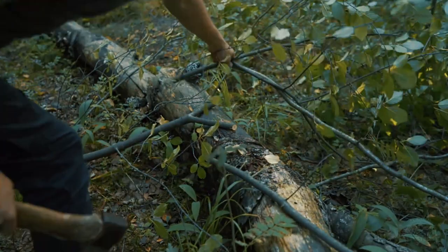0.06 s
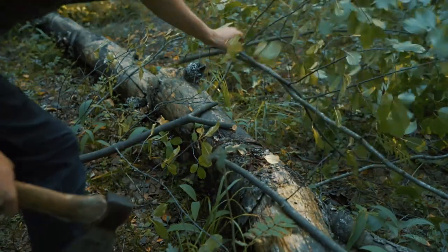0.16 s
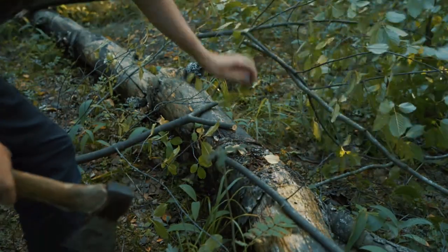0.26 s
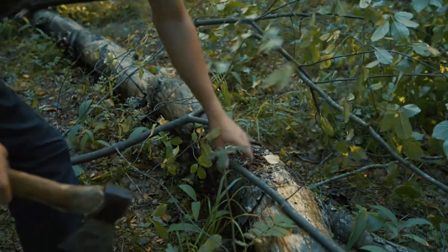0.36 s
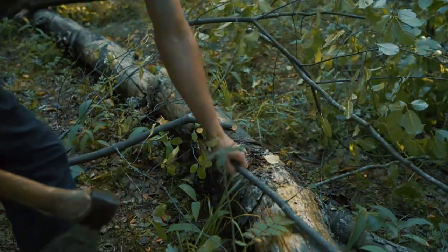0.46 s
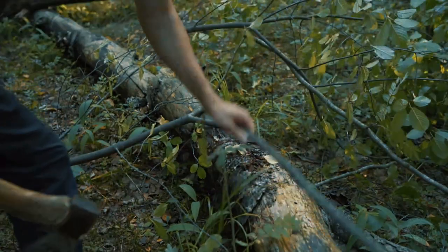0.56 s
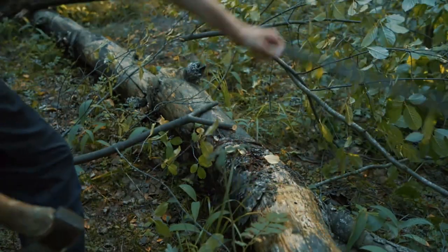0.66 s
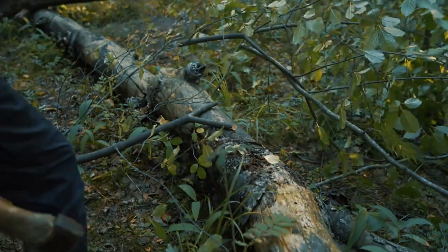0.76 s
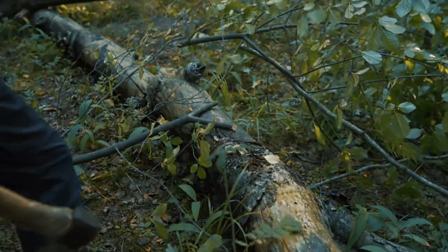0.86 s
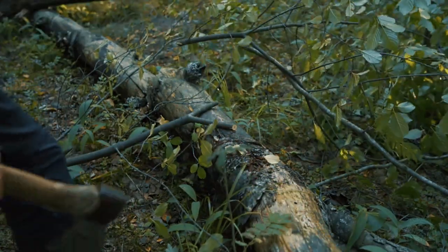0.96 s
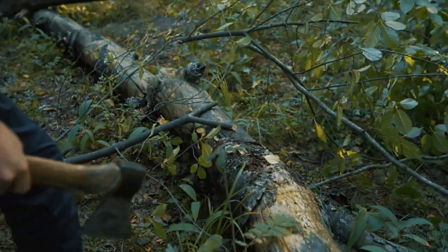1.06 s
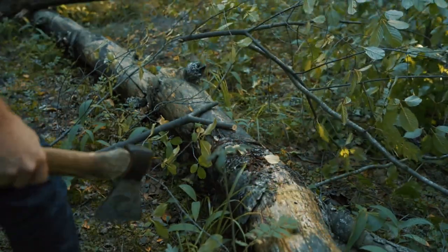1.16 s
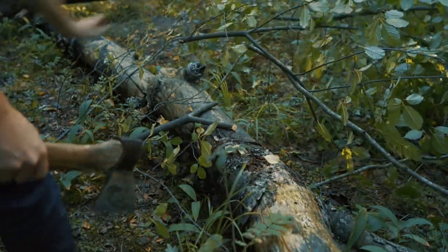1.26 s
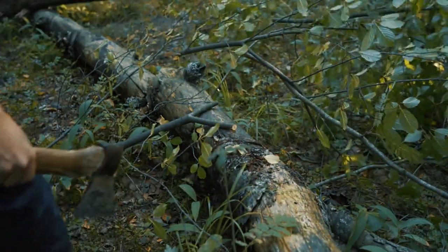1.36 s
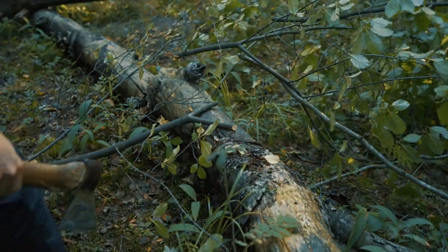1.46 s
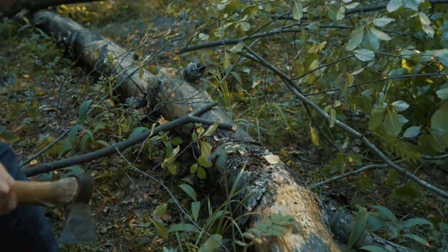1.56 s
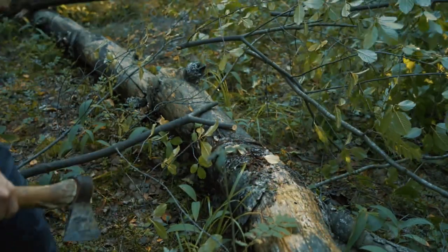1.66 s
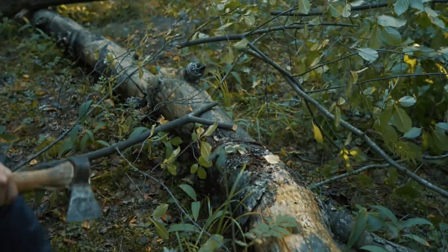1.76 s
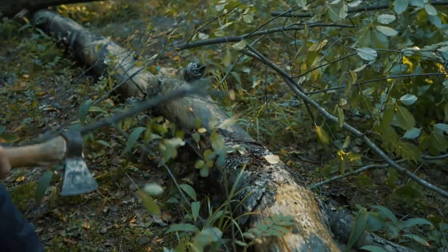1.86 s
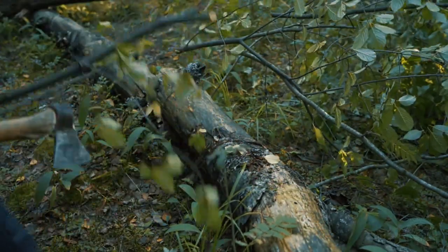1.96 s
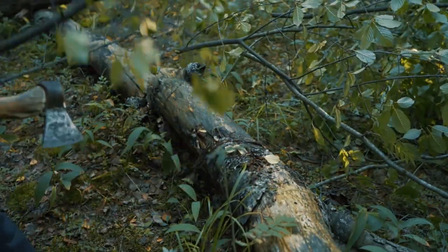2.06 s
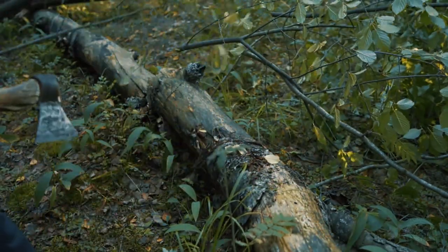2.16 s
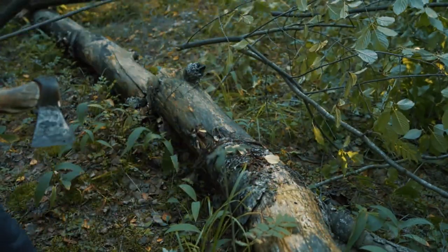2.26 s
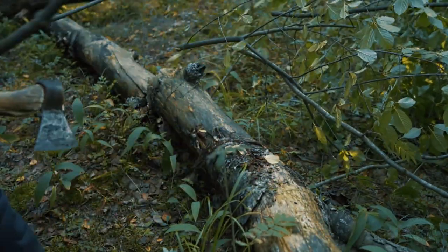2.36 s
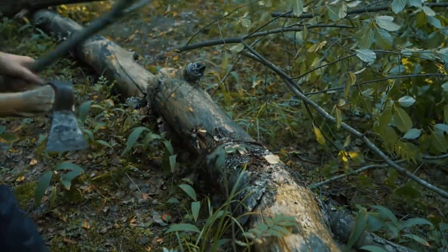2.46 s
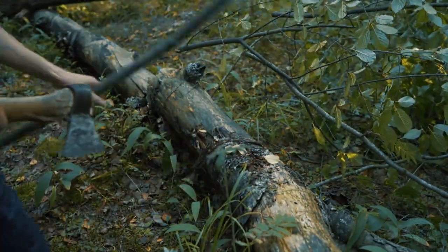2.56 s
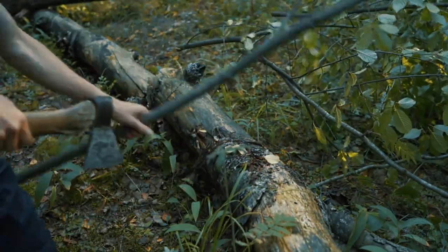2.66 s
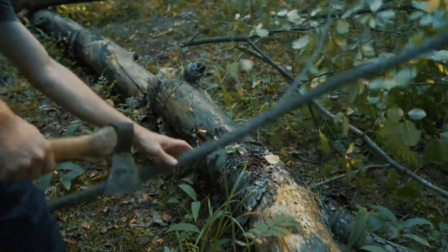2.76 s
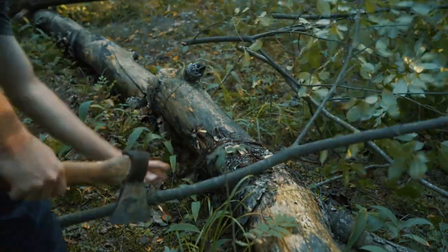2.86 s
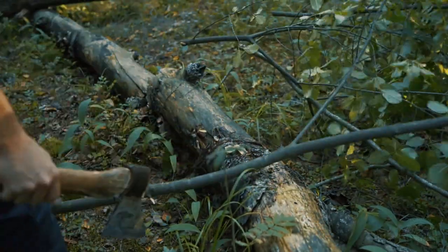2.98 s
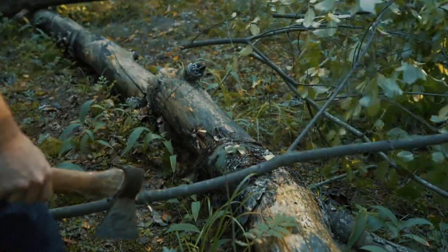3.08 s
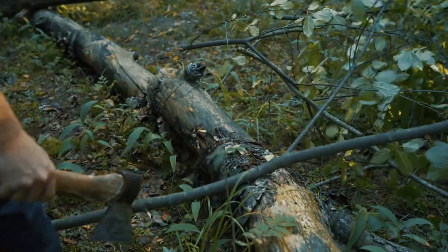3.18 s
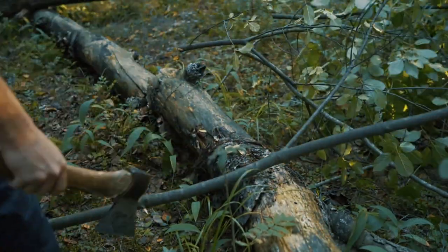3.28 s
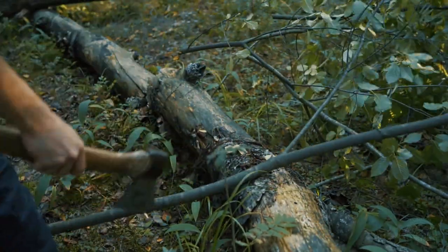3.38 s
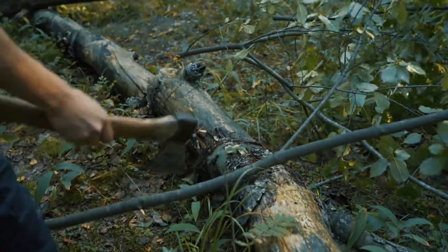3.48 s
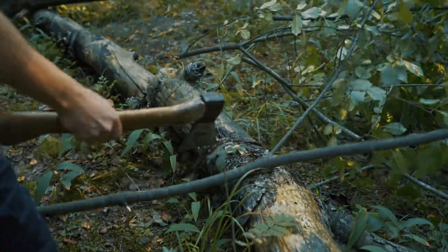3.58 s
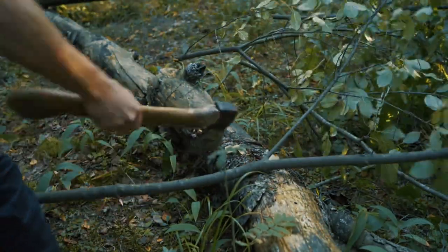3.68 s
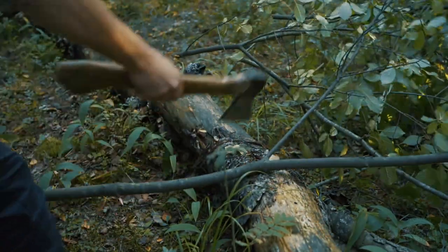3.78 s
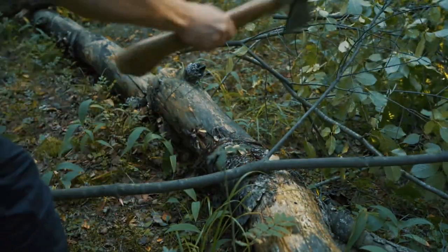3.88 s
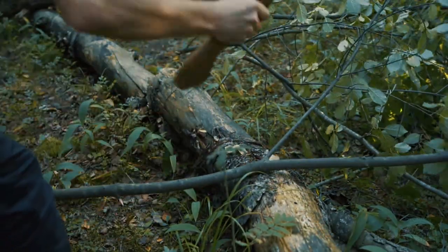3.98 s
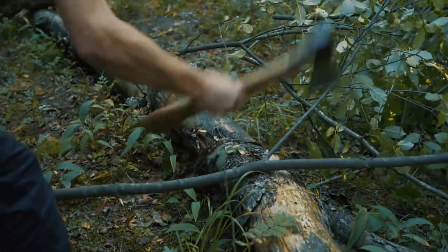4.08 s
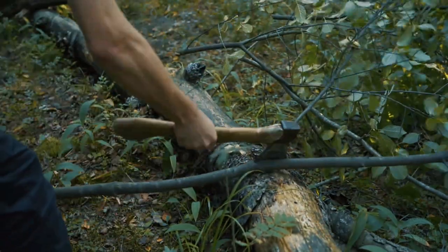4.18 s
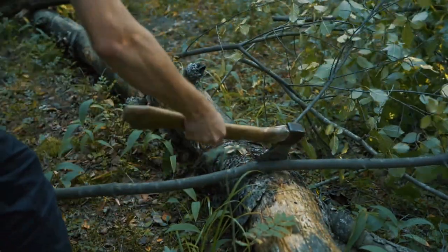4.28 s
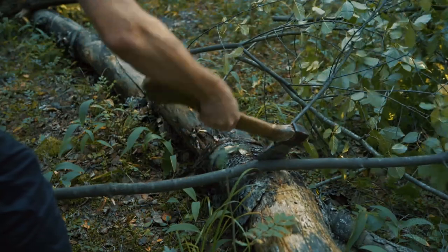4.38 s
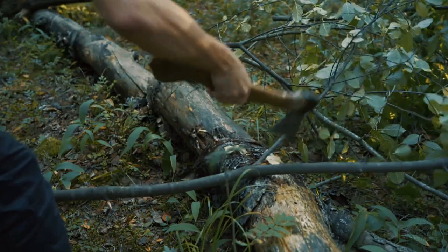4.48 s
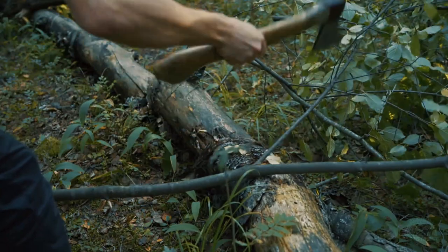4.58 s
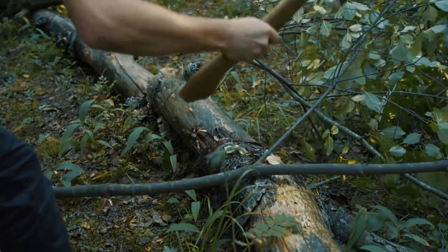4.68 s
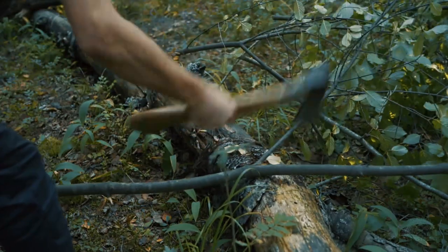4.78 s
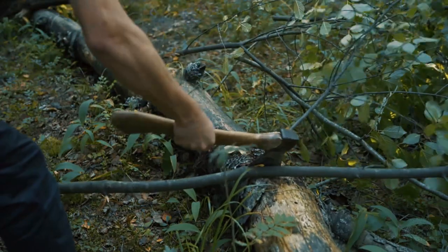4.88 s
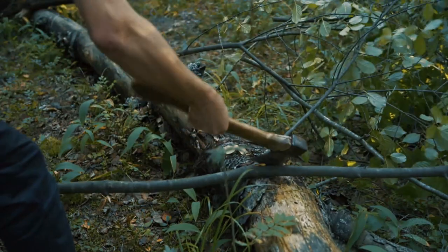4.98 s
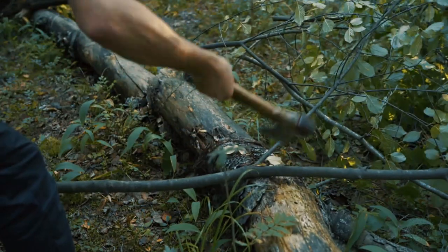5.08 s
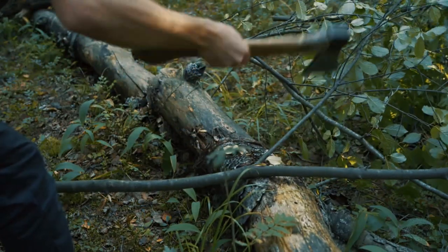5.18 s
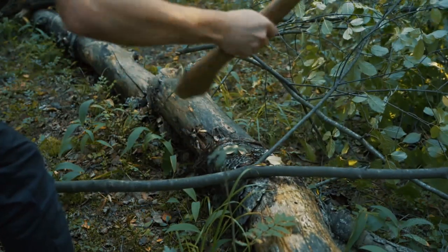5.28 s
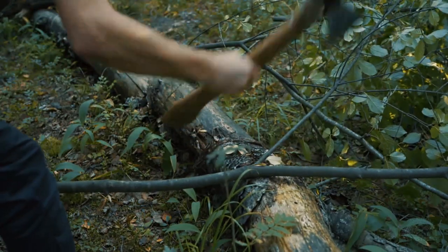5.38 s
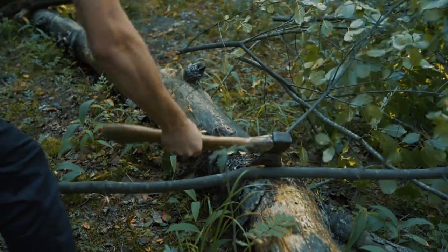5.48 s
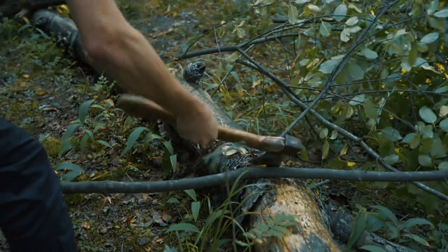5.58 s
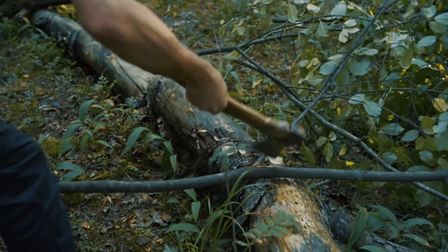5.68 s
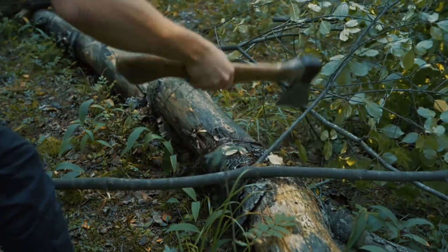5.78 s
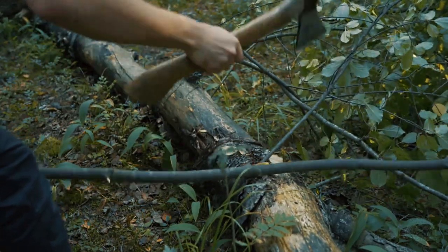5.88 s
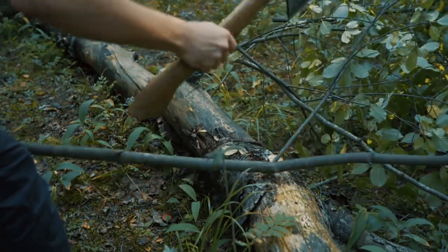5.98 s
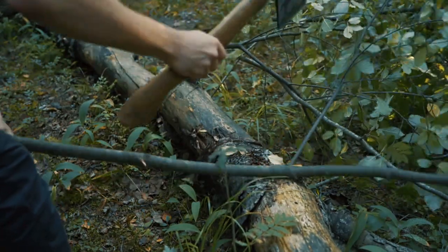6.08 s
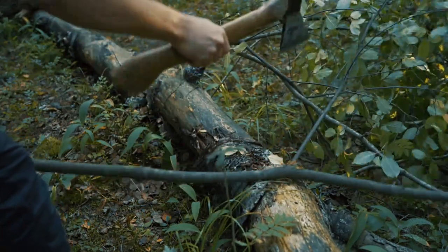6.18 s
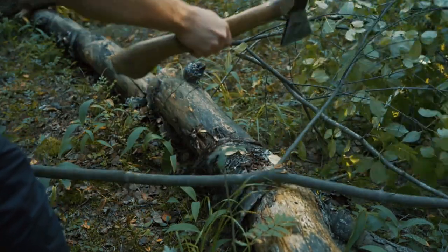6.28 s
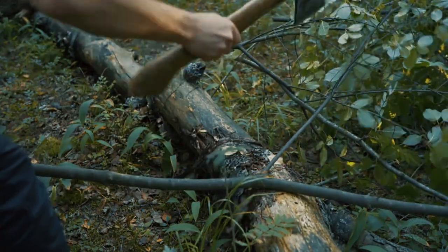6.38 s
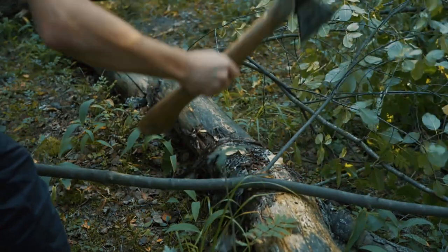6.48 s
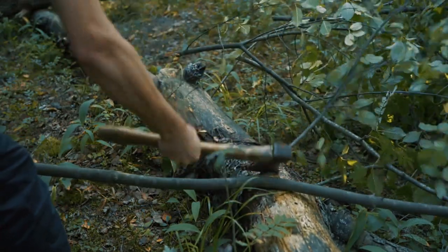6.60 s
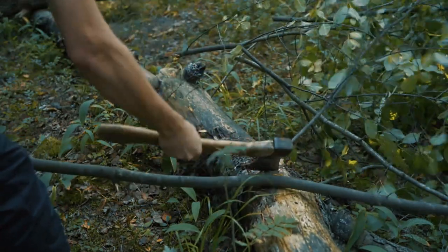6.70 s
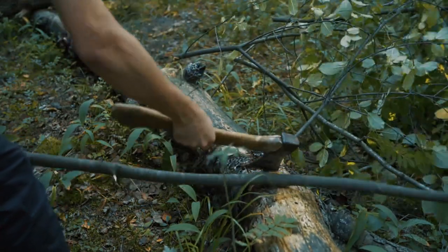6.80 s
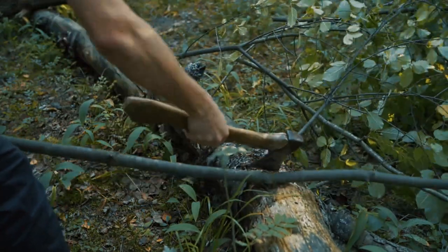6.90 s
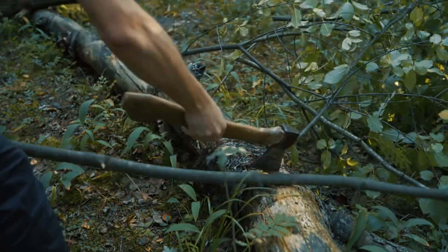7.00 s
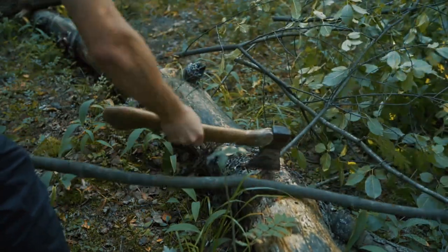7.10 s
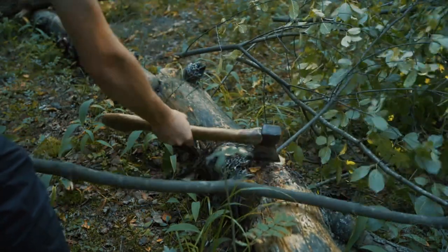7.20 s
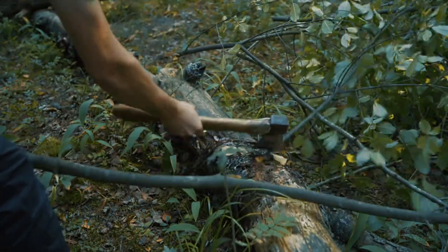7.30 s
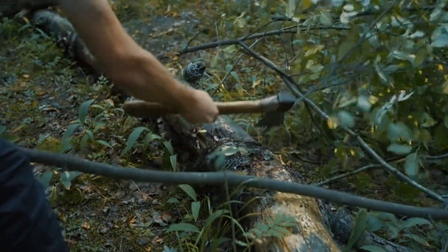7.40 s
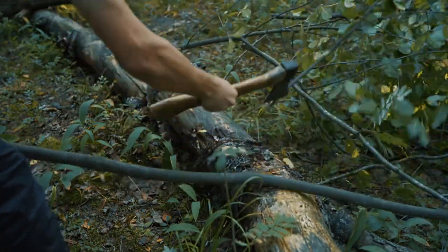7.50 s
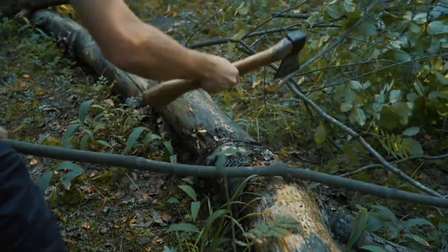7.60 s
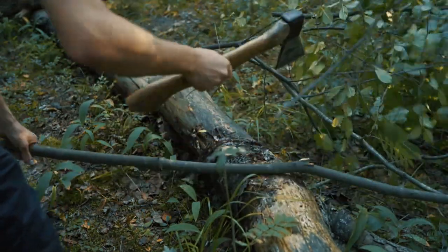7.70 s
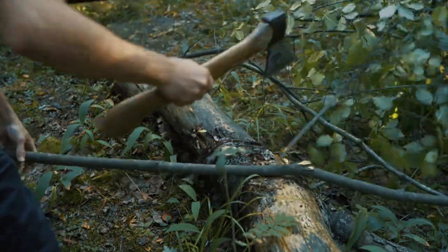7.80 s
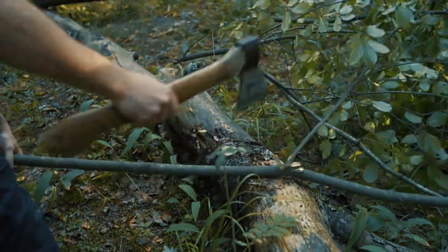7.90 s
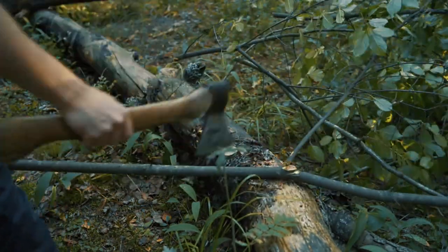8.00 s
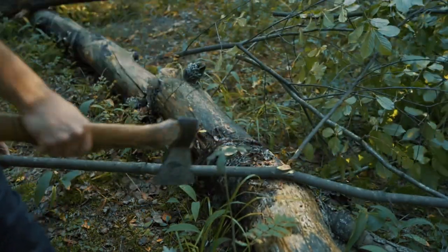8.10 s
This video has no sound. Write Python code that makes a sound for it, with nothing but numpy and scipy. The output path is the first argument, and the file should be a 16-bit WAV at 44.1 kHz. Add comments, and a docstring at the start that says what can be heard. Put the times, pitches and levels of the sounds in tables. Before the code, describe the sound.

Leafy branch rustles and is dropped across a fallen trunk, then four sharp hatchet chops crack into the wood in a quiet forest.

```python
"""A hatchet chops a leafy branch, dragged up and laid across a fallen trunk in a quiet forest.
Each of the four blows is a quick run of fibre cracks over a low thud; the last one splinters the wood.
The trees scatter the wood sounds back. Each pull on the branch makes the leaves hiss, swell and settle.
Twigs snap, crumbs of bark tick on the litter, and puffs of air buffet the microphone over a faint hush."""
import sys
import numpy as np
from scipy import signal
from scipy.fft import rfft, irfft, next_fast_len
from scipy.io import wavfile
from scipy.ndimage import uniform_filter1d

SR = 44100
rng = np.random.default_rng(int(sys.argv[2]) if len(sys.argv) > 2 else 0)


def generate_wav(signal):
    """Clip the signal to [-1, 1] and save it as 16-bit WAV at the path in sys.argv[1]."""
    frames = np.transpose(np.atleast_2d(signal))
    scaled = np.clip(frames, -1, 1) * 32767
    pcm = np.round(scaled).astype(np.int16)
    wavfile.write(sys.argv[1], SR, pcm)


N = 359210
TIME = np.arange(N) / SR  # s
EDGE_HZ = 16100  # upper limit of the sound

# The branch driven against the trunk by each blow.
# Each row: time in seconds, level of the swing in dB, its pitch in Hz, level of the ring in dB.
BLOWS = [(4.1763, -15.5, 172, -18.5), (4.8666, -15, 191, -20), (5.5059, -8.5, 265, -26),
         (6.6485, -26, 245, -25.5)]


def amp(db):
    """Decibels to gain."""
    return 10 ** (np.asarray(db) / 20)


def unit(x):
    """Scales to rms 1."""
    return x / np.sqrt(np.mean(x ** 2) + 1e-20)


def read(points, hz):
    """Reads a table of (Hz, value) on a log-frequency axis."""
    f, value = np.transpose(points)
    return np.interp(np.log(hz + 1), np.log(f + 1), value)


def add(mix, s, sound):
    """Mixes a sound in from s seconds on, cut at the end of the mix."""
    part = mix[round(s * SR):][:len(sound)]
    part += sound[:len(part)]


def colour(x, points):
    """Shapes a steady sound by a spectrum of (Hz, dB); rms 1."""
    gain = amp(read(points, np.fft.rfftfreq(len(x), 1 / SR)))
    return unit(irfft(rfft(x) * gain, len(x)))


def causal(points, size=2048):
    """Minimum-phase impulse response with this spectrum, its energy packed at the start; energy 1."""
    log_gain = np.log(amp(read(points, abs(np.fft.fftfreq(size, 1 / SR)))))
    response = np.fft.ifft(np.exp(np.conj(signal.hilbert(log_gain)))).real
    return response / np.linalg.norm(response)


def treble(x, corner_hz=7000):
    """The part of a sound above the corner."""
    return signal.sosfiltfilt(signal.butter(2, corner_hz, "high", fs=SR, output="sos"), x)


def bass(x, corner_hz=1000):
    """The part of a sound below the corner."""
    return signal.sosfiltfilt(signal.butter(2, corner_hz, fs=SR, output="sos"), x)


def resonate(x, hz, sharpness):
    """One broad resonance of gain 1 at its peak."""
    return signal.lfilter(*signal.iirpeak(hz, sharpness, fs=SR), x)


def burst(t, rise, fade, count=4):
    """A dense run of tiny fractures that swells and dies, its energy spread almost evenly over all pitches."""
    swell = np.minimum(t / rise, 1) * np.exp(-np.maximum(t - rise, 0) / fade)
    x = swell * rng.standard_normal(len(t))
    for _ in range(count):  # flatten the spectrum, then hold the noise within the swell again
        phase = np.angle(rfft(x))
        white = irfft(np.exp(1j * phase), len(t)) * np.linalg.norm(swell)
        x = np.clip(white, -2 * swell, 2 * swell)
    return x


def crackle(per_s, size_db, fade):
    """Random tiny ticks of uneven size, each a dying speck of noise; rms 1."""
    sizes = amp(size_db * np.minimum(rng.exponential(1, N), 4))
    ticks = sizes * (rng.random(N) < per_s / SR)
    envelope = signal.lfilter([1], [1, -np.exp(-1 / (fade * SR))], ticks)
    return unit(envelope * rng.standard_normal(N))


def cracks(ring_db=-6, crack_db=-1, detune=0.06, chip_db=0, chip_sharpness=5):
    """Fibres break in bursts, heard directly and through a brief ring, its pitch a little random per crack."""
    # Wood fibres giving way under the blade. Each row: time in seconds, relative level in dB,
    # rise in seconds, fade in seconds, treble in dB, body in dB, pitch of the chip in Hz.
    breaks = [(4.1726, -18.5, 0.00015, 0.0044, -4, 7, 1390), (4.175, -8, 0.00039, 0.0021, 9, 1, 1350),
              (4.178, -3.5, 0.00049, 0.0018, -2.5, -14, 2860), (4.1858, -19.5, .0003, 0.0015, 2, 7.5, 3490),
              (4.8613, -15, 0.001, 0.0064, 1, 4, 5170), (4.8680, -4.5, .0003, 0.0018, 3, -6, 3210),
              (4.8734, -13, 0.00023, 0.0015, 4, -2, 3630), (5.4978, -19.5, 0.00063, 0.003, 0, 9, 1102),
              (5.5010, -7.5, 0.002, 0.0037, -1.5, 1.5, 3560), (5.5074, -5, 0.00046, 0.002, 2, -1.5, 1454),
              (6.6366, -23.5, .0003, 0.0057, 8.5, 4.5, 1300), (6.6378, -18, 0.00023, 0.0006, 10.5, 6, 3700),
              (6.6465, -13, 0.000096, 0.0035, 4.5, -7, 3900), (6.652, -27, 0.0014, 0.0055, 3, 8, 3900)]
    # Ring of the cut wood and the hatchet head. Each row: pitch in Hz, width in Hz, level in dB.
    ring_modes = [(1230, 150, -1.5), (1730, 220, 4.5), (2600, 260, -0.5), (2900, 140, -6.5), (3670, 94, -1),
                  (4520, 400, 0.5), (5330, 390, 4), (9900, 320, -3)]
    # Colour of splitting wood. Each row: frequency in Hz, level in dB.
    split_colour = [(100, -20), (350, 1.5), (600, 2.5), (830, -4.5), (1300, 0), (2150, -5), (3200, 1),
                    (4600, -4), (5800, -0.5), (7400, -9.5), (10000, -6), (14000, -5), (16500, -20.5)]
    min_width = 130  # Hz; least width of a mode, which keeps every ring short
    t, out = np.arange(SR // 20) / SR, np.zeros(N)
    direct = causal(split_colour)
    for s, db, rise, fade, treble_db, body_db, chip_hz in breaks:
        shift = 1 + detune * rng.uniform(-1, 1)
        ring = np.zeros(len(t))
        for hz, width, level_db in ring_modes:
            decay = np.exp(-np.pi * max(width, min_width) * t)
            ring += amp(level_db) * decay * np.cos(2 * np.pi * hz * shift * t)
        wood = amp(ring_db) * ring / np.linalg.norm(ring)
        add(wood, 0, direct)
        wood = wood / np.linalg.norm(wood)
        fibres = burst(t, rise, fade)
        force = fibres + (amp(treble_db) - 1) * treble(fibres) + (amp(body_db) - 1) * bass(fibres)
        force = force + amp(chip_db) * resonate(fibres, chip_hz, chip_sharpness)  # the chip's own knock
        add(out, s, amp(db + crack_db) * signal.fftconvolve(force, wood))
    return out


def tearing():
    """Long fibres peel apart in a dense crackle."""
    # The half-cut branch splintering after the last blow. Each row: time in seconds, level in dB.
    course = [(6.645, -56), (6.655, -37), (6.68, -32.5), (6.705, -42.5), (6.725, -53), (6.76, -49),
              (6.8, -84)]
    # Colour of the splinters. Each row: frequency in Hz, level in dB.
    splinter_colour = [(150, -5), (300, -12), (800, -4), (2000, -4), (3600, 1.5), (5500, -3.5),
                       (7500, -6.5), (11000, -10.5), (16000, -16)]
    level_db = np.interp(TIME, *np.transpose(course), left=-np.inf, right=-np.inf)
    return amp(level_db) * colour(crackle(per_s=4500, size_db=1, fade=0.00067), splinter_colour)


def thuds(spread=0.79, lead=0.0036, push_db=-15, push_s=0.0025, ring_lead=0.0015):
    """The branch is shoved away and springs back in one swing, then rings on in its bending modes."""
    # Bending modes of the branch. Each row: pitch in Hz, level in dB, time to fall 60 dB in seconds.
    bending_modes = [(87, -15.5, .14), (128, -9, 0.097), (218, -1.5, 0.081), (307, -3, 0.037),
                     (500, -16.5, .05), (583, -16, 0.12)]
    t, out = np.arange(SR // 2) / SR, np.zeros(N)
    ring = sum(amp(db - 60 * t / t60) * np.sin(2 * np.pi * hz * t) for hz, db, t60 in bending_modes)
    u = (t - lead) / push_s
    push = amp(push_db) * (1 - u ** 2) * np.exp(-u ** 2 / 2)  # the heavy trunk yields more slowly
    for s, db, hz, ring_db in BLOWS:
        cycles = (t - lead) * hz
        swing = np.exp(-(cycles / spread) ** 2) * np.cos(2 * np.pi * cycles)
        add(out, s - lead, -amp(db) * (swing + push))
        add(out, s - ring_lead, -amp(ring_db) * ring)  # the ring sets in with the shove
    return out


def bumps(overtone_db=-10, overtone=1.27, rise=0.0029, scuff_db=-9):
    """Soft landings of the branch ring two low modes, with a dull scuff of bark on bark."""
    # The branch set down and bouncing on the trunk.
    # Each row: time in seconds, level in dB, pitch in Hz, time to fall 60 dB in seconds.
    landings = [(2.624, -47.5, 115, 0.14), (2.878, -27, 268, 0.051), (2.883, -40, 516, 0.074),
                (2.894, -25, 105, 0.1), (2.924, -30, 245, 0.068), (3.095, -37.5, 150, 0.039),
                (3.257, -35.5, 101, 0.16), (3.4, -48, 108, 0.16), (6.122, -43, 177, 0.065)]
    t, out = np.arange(SR // 2) / SR, np.zeros(N)
    for s, db, hz, t60 in landings:
        turn = 2 * np.pi * hz * t
        scuff_colour = [(hz / 4, -20), (hz / 2, 0), (hz * 0.93, -2), (hz * 3, -18), (hz * 8, -55)]
        scuff = colour(rng.standard_normal(len(t)), scuff_colour)
        knock = np.sin(turn) + amp(overtone_db) * np.sin(overtone * turn) + amp(scuff_db) * scuff
        add(out, s, amp(db - 60 * t / t60) * (1 - np.exp(-t / rise)) * knock)
    return out


def twigs(sharpness=3.8, tick_db=-8):
    """Each twig gives a short burst in one broad resonance, with a dry tick on top."""
    # Twigs snapping and tapping. Each row: time in seconds, peak level in dB, pitch in Hz,
    # fade in seconds, relative treble in dB.
    snaps = [(0.522, -39.5, 2160, 0.0038, -17), (.9514, -37, 3000, 0.0015, -17),
             (1.1759, -27.5, 4100, 0.00098, 11), (1.2372, -35, 3340, 0.0062, -22),
             (1.236, -34, 1310, 0.0086, -26), (1.868, -29.5, 3360, 0.0025, -33),
             (1.8684, -35.5, 1970, 0.0012, -36), (2.521, -42.5, 2450, .0026, -24),
             (2.638, -33.5, 3060, 0.00073, -17), (2.851, -27.5, 3380, 0.0038, -27),
             (2.881, -30, 3800, 0.0036, 2), (2.8878, -22.5, 12000, 0.0017, -4),
             (3.011, -29, 3540, 0.0021, -8), (3.242, -31.5, 3520, 0.0017, 0), (3.658, -31, 3250, .0035, 7),
             (5.8643, -48, 9320, .001, -2.5), (6.121, -34.5, 3600, 0.0075, 3),
             (6.178, -37, 3300, 0.0021, -24), (6.9902, -30.5, 1180, .0034, -13),
             (6.9907, -26, 3030, 0.00099, -7), (7.1951, -37, 3550, .0016, -18),
             (7.439, -30.5, 3620, 0.0012, -15), (7.4595, -21, 3740, .0028, 11),
             (7.477, -36.5, 1770, 0.0044, -22), (7.519, -19, 3460, .003, 14),
             (7.638, -38.5, 885, 0.0064, -26), (7.9246, -35.5, 3300, 0.0059, -1)]
    t, out = np.arange(SR // 20) / SR, np.zeros(N)
    for s, db, hz, fade, treble_db in snaps:
        snap = burst(t, rise=0.0002, fade=fade)
        tick = amp(treble_db + tick_db) * treble(snap, corner_hz=2490)
        sound = resonate(snap, hz, sharpness) + tick
        add(out, s, amp(db) * sound / abs(sound).max())
    return out


def woods(x, near_db=-16, near_t60=0.064, near_delay=0.005, far_delay=0.015):
    """Ground and trunk answer first; countless farther trees blur each band into a smooth, dying hiss."""
    # Scatter from the trees, band by band, each band reaching up to the next.
    # Each row: lower edge in Hz, level in dB, time to fall 60 dB in seconds.
    scatter = [(55, -13, 0.49), (126.7, -20, 0.29), (188, -15, 0.26), (253, -20, 0.2), (503, -20.5, 0.25),
               (1100, -21, 0.27), (2500, -22, 0.33), (4120, -23, 0.38), (6800, -26.5, 0.24)]
    t = np.arange(SR) / SR
    near = burst(t[:SR // 10], rise=0.00054, fade=near_t60 / np.log(1000))
    near = np.pad(near, (round(near_delay * SR), 0))
    near = near - 0.29 * treble(near)
    out = x + signal.oaconvolve(x, amp(near_db) * near / np.linalg.norm(near))[:N]
    tops = [row[0] for row in scatter[1:]] + [EDGE_HZ]
    for (low, db, t60), top in zip(scatter, tops):
        band = signal.butter(3, [low, top], "band", fs=SR, output="sos")
        decay = (amp(-60 * t / t60) * np.minimum(t / far_delay, 1)) ** 2
        # the power of the sound, smeared over the decay, drives fresh noise in the same band
        power = signal.oaconvolve(signal.sosfilt(band, x) ** 2, decay / decay.sum())[:N]
        hiss = unit(signal.sosfilt(band, rng.standard_normal(N)))
        out += amp(db) * np.sqrt(abs(power)) * hiss
    return out


def leaves(leaf_db=-0.64, crisp_db=7, tick_db=-12, flick_db=-9):
    """Countless leaf contacts blur into a fluttering hiss, with dry ticks and stem flicks standing out."""
    # Colour of rustling leaves. Each row: frequency in Hz, level in dB.
    leaf_colour = [(240, -40), (400, -13), (553, -6.5), (719, -11), (1270, 4), (1630, -7.5), (2050, -5.5),
                   (2970, 0), (3690, 3.5), (4510, -3), (5600, 3), (7630, -13.5), (13700, -18), (15300, -16),
                   (16000, -23.5)]
    # Colour of stems sliding over the litter. Each row: frequency in Hz, level in dB.
    drag_colour = [(150, -45.5), (250, -7), (528, -6), (831, -9.5), (1450, -5), (1730, -8), (2130, -3),
                   (3710, -2), (4490, -8.5), (7440, -16), (12300, -17.5), (16000, -22.5)]
    level, crispness_db, sliding = foliage()
    contacts = unit(flutter()) + amp(tick_db) * crackle(per_s=200, size_db=6.5, fade=0.0012)
    rustle = (1 - sliding) * colour(contacts, leaf_colour) + sliding * colour(contacts, drag_colour)
    rustle = rustle + (amp(crispness_db + crisp_db) - 1) * treble(rustle)
    return level * (amp(leaf_db) * rustle + amp(flick_db) * flicks())


def foliage():
    """Moves swell, sag and settle, blows leave a tremble: level, crispness dB and sliding over time."""
    # Pulls and shoves that set the foliage moving. Each row: start in seconds, rise in seconds,
    # hold in seconds, level in dB, relative crispness in dB, share of sliding from 0 to 1.
    moves = [(0, 0.0033, 0.088, -55.5, 1.5, 0.5), (0.14, 0.15, 0.016, -58, 6.5, 0.6),
             (0.492, 0.032, 0.038, -55.5, 1, 0.74), (0.617, 0.27, .12, -44.5, -4, 0.94),
             (1.04, 0.19, 0.054, -48.5, 0.5, 0.77), (1.86, 0.063, 0.3, -54, 1, 0.38),
             (2.302, 0.055, .02, -57.5, 5, .7), (2.529, 0.069, 0.19, -50.5, -4, 0.57),
             (2.748, 0.056, 0.24, -46.5, -1.5, 0.67), (3.129, 0.056, 0.11, -52, 0.5, 0.3),
             (3.473, 0.21, 0.15, -54.5, -0.5, 0.6), (4.35, 0.17, .03, -60.5, 0, .55),
             (5.884, 0.061, 0.17, -52, -3.5, 0.42), (6.053, 0.2, 0.13, -50.5, -1.5, .65),
             (6.715, 0.086, 0.15, -55.5, 0, 0.5), (7.022, 0.031, 0.3, -50, -1, 0.68),
             (7.254, 0.098, 0.39, -49.5, 0.5, 0.45), (7.506, 0.0094, 0.026, -46.5, 2.5, 0.75),
             (7.68, 0.03, 0.85, -52, -2, 0.65)]
    sag, settle = 11, 64  # dB per s: the rustle tires while a move lasts, then the leaves settle
    shake_db, shake_fall = -57.5, 43.5  # leaves left trembling by each blow: dB, dB per s
    powers = []
    for start, rise, hold, db, _, _ in moves:
        age = TIME - start - rise  # s since the full swell
        fall_db = sag * np.clip(age, 0, hold) + settle * np.maximum(age - hold, 0)
        swell = np.clip(1 + age / rise, 0, 1)
        powers.append((swell * amp(db - fall_db)) ** 2 + 1e-14)
    moving = np.sum(powers, axis=0)
    # the stronger a move at this moment, the more its character counts
    crispness_db, sliding = np.array(moves)[:, -2:].T @ np.array(powers) / moving
    trembling = sum((TIME > s) * amp(shake_db - shake_fall * abs(TIME - s)) ** 2 for s, *_ in BLOWS)
    return np.sqrt(moving + trembling), crispness_db, np.clip(sliding, 0, 1)


def flutter(flutter_db=2.8, tick_db=-3, rate_hz=45):
    """Leaf contacts, a smooth wash and single ticks, that come and go band by band."""
    # Leaves of each size flutter on their own: band centres in Hz.
    centres = [700, 1400, 2400, 3600, 5200, 8000, 12000]
    size = next_fast_len(N)
    hz, spectrum = np.fft.rfftfreq(size, 1 / SR), 0
    slow = signal.butter(2, rate_hz, fs=SR, output="sos")
    for own in np.eye(len(centres)):  # 1 at the band's own centre, 0 at the others
        waver = unit(signal.sosfilt(slow, rng.standard_normal(N)))
        ticks = crackle(per_s=700, size_db=4.0, fade=0.0021)
        contacts = rng.standard_normal(N) + amp(tick_db) * ticks
        band = np.sqrt(read(list(zip(centres, own)), hz))
        spectrum = spectrum + rfft(contacts * amp(flutter_db * waver), size) * band
    return irfft(spectrum, size)[:N]


def flicks(sharpness=3.5):
    """Small stems flick one another at random, each with a brief, broad pitch; rms 1."""
    # Pitches of the stems in Hz.
    pitches = [1280, 2270, 3000, 3676, 5180]
    return unit(sum(resonate(crackle(per_s=14, size_db=2.5, fade=0.0042), hz, sharpness) for hz in pitches))


def swishes(sharpness=1.35):
    """A sweep of fine grains gathered around one broad pitch."""
    # Leaves brushing past softly.
    # Each row: time of the peak in seconds, level in dB, length in seconds, pitch in Hz.
    brushes = [(0.88, -52, 0.29, 2770), (2.398, -48, 0.12, 2980), (7.565, -44, 0.039, 2700)]
    grains, out = crackle(per_s=1000, size_db=-7.5, fade=0.00044), np.zeros(N)
    for s, db, length, hz in brushes:
        sweep = np.exp(-(2 * (TIME - s) / length) ** 2)
        pitched = resonate(resonate(grains, hz, sharpness), hz, sharpness)
        out += amp(db) * sweep * unit(pitched)
    return out


def debris(level_db=-60.5, fall=26):
    """Crumbs of bark land on dry litter in sparse, bright ticks, sinking in level (dB per s) after a blow."""
    level = sum((TIME > s) * amp(level_db - fall * abs(TIME - s)) for s, *_ in BLOWS)
    ticks = crackle(per_s=45, size_db=2.5, fade=0.0006)
    return level * colour(ticks, [(400, -20), (1500, -3), (3600, 0), (14000, -1)])


def air():
    """Slow eddies push on the microphone; puffs strengthen them and break up into faster ones."""
    # Air stirring at the microphone, calm at first and livelier later. Each row: time in seconds, level in dB.
    stir = [(0, -53), (2.1, -51), (3.6, -47), (5.1, -43), (8.1, -42)]
    # Puffs from the swinging branch and arm. Each row: time of the peak in seconds, level in dB,
    # length in seconds, fast eddies in dB relative to the puff.
    gusts = [(1.135, -41, 0.12, -19.5), (3.554, -37, 0.16, -40), (6.173, -27.5, 0.097, -43.5),
             (6.608, -25.5, 0.067, -24), (7.094, -26.5, 0.16, -40), (7.511, -17.5, 0.072, -19.5),
             (7.65, -34.5, 0.079, -6), (7.762, -31.5, 0.46, -21)]
    # Colour of the slow eddies. Each row: frequency in Hz, level in dB.
    slow_colour = [(8, 3.5), (20, 4.5), (34, -8), (46, -12.5), (70, -24.5), (112, -44), (200, -62),
                   (440, -100)]
    # Colour of the fast eddies. Each row: frequency in Hz, level in dB.
    fast_colour = [(20, -6), (60, 7.5), (110, -23), (220, -17.5), (500, -41)]
    eddies = colour(rng.standard_normal(N), slow_colour)
    smoothed_power = uniform_filter1d(uniform_filter1d(eddies ** 2, size=4000), size=4000)
    even_eddies = eddies / np.sqrt(smoothed_power)
    puffs = np.array([amp(db) * np.exp(-(2 * (TIME - s) / length) ** 2) for s, db, length, _ in gusts])
    stir_level = amp(np.interp(TIME, *np.transpose(stir)))
    slow = np.hypot(stir_level, puffs.sum(0)) * even_eddies
    fast_level = amp(np.array(gusts)[:, -1]) @ puffs
    return slow + fast_level * colour(rng.standard_normal(N), fast_colour)


def hush(level_db=-63):
    """The distant forest is a steady, faint noise, mostly low."""
    # Colour of the forest's hush. Each row: frequency in Hz, level in dB.
    forest_colour = [(47, -22), (80, -2), (248, -12.5), (289, -12), (515, -14.5), (785, -18), (1250, -13.5),
                     (1990, -21), (2490, -17), (3620, -15.5), (8410, -30), (13700, -34), (16000, -36)]
    return amp(level_db) * colour(rng.standard_normal(N), forest_colour)


def scene():
    """Blows and handling among the trees, over leaves, falling crumbs, air and the forest's hush."""
    wood = cracks() + tearing() + thuds() + bumps() + twigs()
    return (woods(wood) + leaves() + swishes() + debris() + air() + hush())[None]


def record(dry):
    """Whatever exceeds full scale clips; then the band limit takes off the top."""
    clipped = np.clip(dry, -1, 1)
    band_limit = signal.firwin(301, EDGE_HZ, window=("kaiser", 8), fs=SR)
    return signal.oaconvolve(clipped, band_limit[None], "same")


dry = scene()
out = record(dry)
generate_wav(out)
```